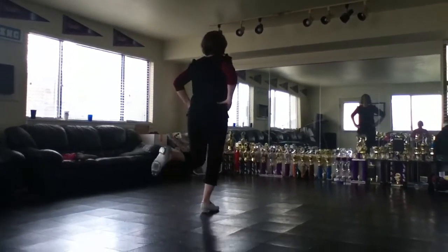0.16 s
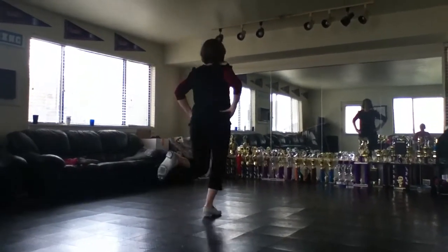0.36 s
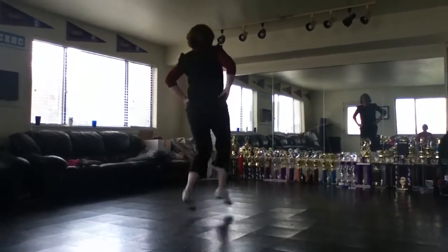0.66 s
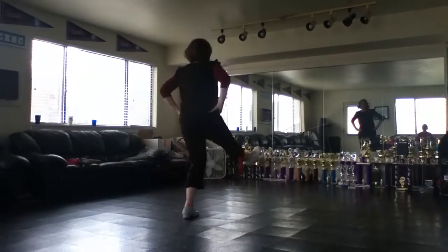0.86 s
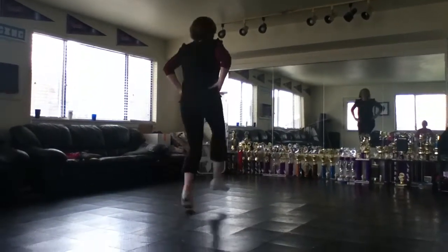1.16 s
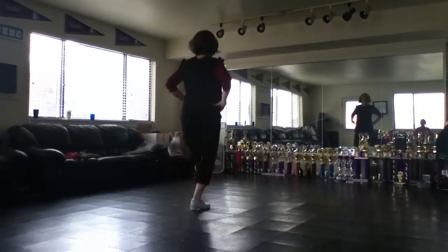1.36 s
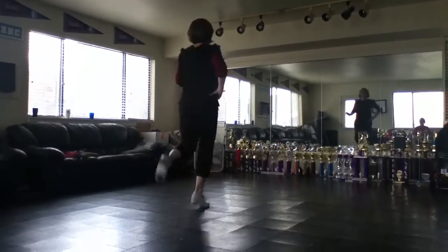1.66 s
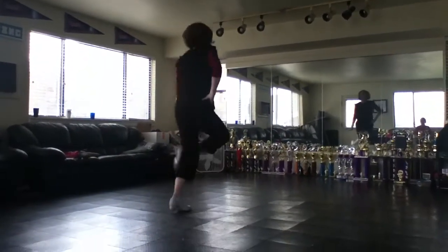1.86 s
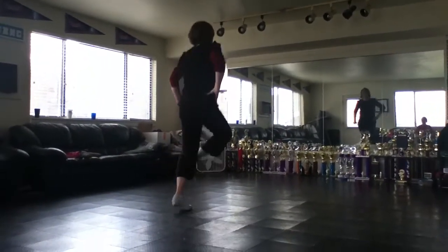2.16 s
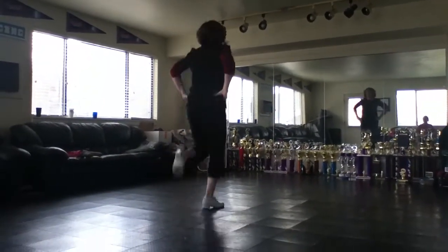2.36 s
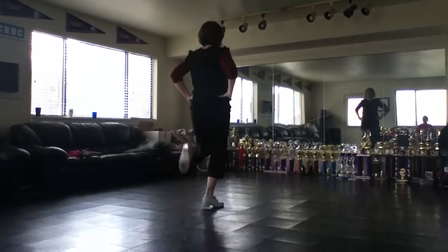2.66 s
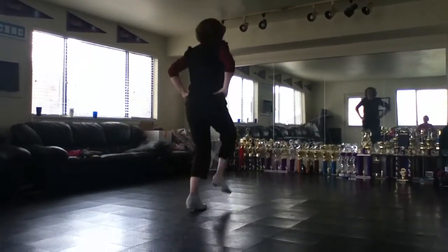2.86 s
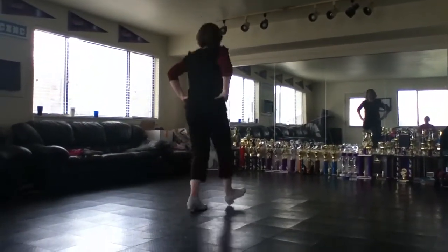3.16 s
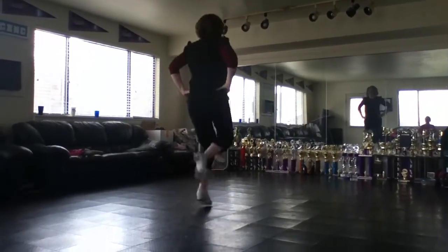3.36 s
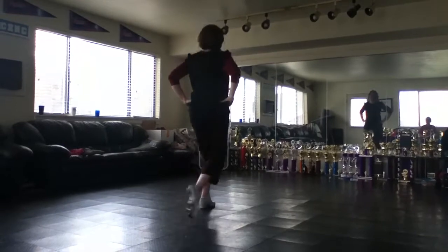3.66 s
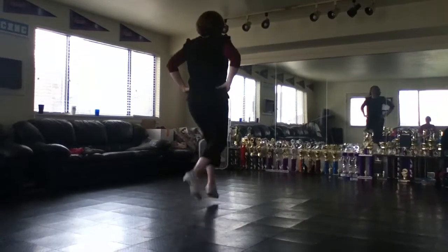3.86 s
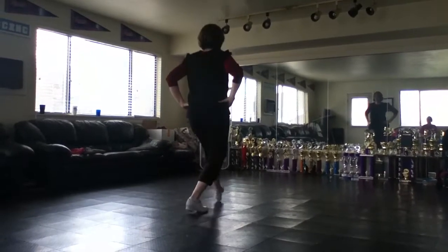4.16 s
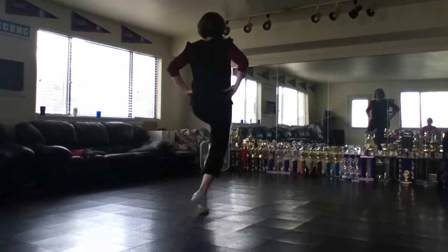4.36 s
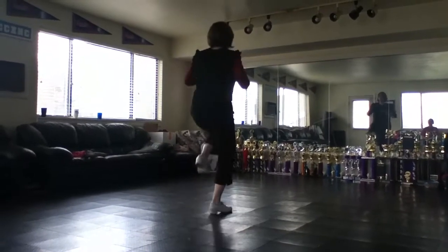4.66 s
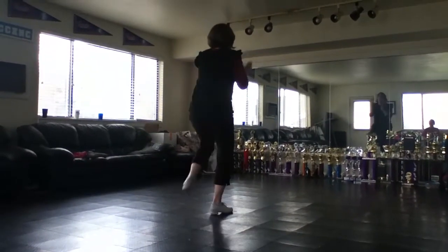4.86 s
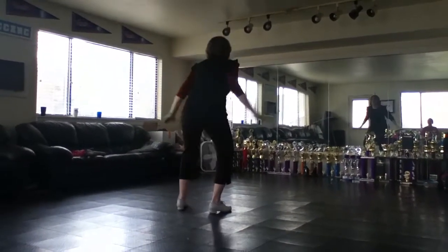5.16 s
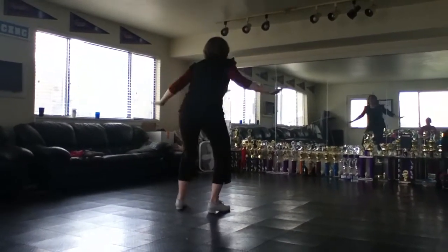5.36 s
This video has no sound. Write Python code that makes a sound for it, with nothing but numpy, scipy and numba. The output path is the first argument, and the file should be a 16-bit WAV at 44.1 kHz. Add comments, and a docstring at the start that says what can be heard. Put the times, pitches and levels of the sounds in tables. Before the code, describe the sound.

A clog dancer works on a tiled floor in a lively mirrored studio, heard in mono from a few metres away. The sound opens on the ringing tail of a stamp just past. Faint steel ticks from a swinging foot come at 0.7 to 0.9 seconds, then a brush and a hard stamp near 1.0. More stamps land at about 1.5, 2.1, 2.6 and 3.1, then quicken at 3.4, 3.7, 3.9 and 4.2. Each is a rapid double touch: low floor thump, tile knock, woody sole clack and bright crack, with loose plates jingling on landing and rebound. Soft brushes and airy jingles fill some gaps. At 4.7 a heavier, less jingly stamp coincides with one mid-range handclap. Two nearly joined stamps finish at about 5.25, their echoes dying into a faint steady hush. Peaks are firmly limited and the extreme top is dull.

```python
"""A clog dancer stamps a slow, then quicker figure on a tiled floor in a bright mirrored studio, a few metres from a camera.
Each stamp lands in two touches that thump the floor, knock the tile, clack the sole and crack the steel tap.
Light brushes lead into some stamps, and loose tap plates jingle as the feet land, rebound and swing.
One hand clap, a burst of mid-range noise, joins a late stamp. Blows pass through echoes and a fading room tail,
over a faint steady hush; the camera's limiter holds the peaks."""
import sys
import numpy as np
from scipy import signal
from scipy.fft import rfft, irfft
from scipy.io import wavfile
from scipy.ndimage import uniform_filter1d, minimum_filter1d
from numba import njit

SR = 44100
rng = np.random.default_rng(int(sys.argv[2]) if len(sys.argv) > 2 else 0)


def to_wav(s):
    """Save 16-bit WAV."""
    ch = np.atleast_2d(s).T  # columns
    pcm = np.round(np.clip(ch, -1, 1) * 32767)  # PCM
    wavfile.write(sys.argv[1], SR, pcm.astype(np.int16))


N = 243431  # length in samples

# Resonances of the steel plates, listed for each shoe.
# Each row: frequency in Hz, width at half power in Hz, relative level in dB.
PLATE_MODES = { "right": [(4970, 410, -2), (5210, 220, -4), (5570, 160, -5.5), (5890, 21, 6),
               (5764, 160, 2.5), (7540, 120, -19), (7970, 91, -7.5), (8450, 120, -5), (10660, 32, -8),
               (12850, 110, -26), (14400, 300, -10)], "left": [(4240, 730, -3), (4530, 164, 3),
               (4790, 180, 8.5), (5780, 310, 0.5), (6670, 69, 4.5), (7550, 210, 3.5), (8830, 68, 7),
               (11300, 140, -14), (11800, 100, -16), (12900, 140, -12), (13800, 200, -37)]}
# The floor's deep sway under full weight.
# Each row: frequency in Hz, width at half power in Hz, relative level in dB.
SWAY_MODES = [(50, 6.5, -6), (70, 12, -7), (116, 46, -7.5), (164.4, 17, 3.5), (208, 46, 2.5)]
# The floor's thud. Each row: frequency in Hz, width at half power in Hz, relative level in dB.
THUD_MODES = [(223, 10, -4), (244.4, 36, -0.5), (293, 100, -1), (331.8, 38, -4)]
# The tile on its bed. Each row: multiple of the pitch, width as a share of the pitch, relative level in dB.
TILE_MODES = [(.78, 0.16, -6), (1.0, 0.18, 1), (1.13, 0.15, -7), (1.33, 0.13, -4)]
# The hard sole. Each row: multiple of the pitch, width as a share of the pitch, relative level in dB.
SOLE_MODES = [(1.0, 0.27, 5), (1.27, 0.13, -8.5), (1.65, 0.53, -3), (2.2, 0.54, -23.5)]
# How the studio fades. Each row: frequency in Hz, time to fall by 60 dB in seconds.
ROOM_FADE = [(60, 0.68), (200, 0.37), (450, 0.6), (1100, 0.63), (2900, 0.87), (5500, 0.8), (9000, 0.6),
             (15000, 0.38)]
# First reflections from floor, ceiling, mirrors and walls.
# Each row: typical delay in seconds, level against the direct sound in dB.
FIRST_ECHOES = [(.0021, -9), (.0052, 0.5), (.0088, -9), (0.0116, -8), (.019, -8.5), (0.0247, -7.5),
                (.0325, -25.5), (.047, -10)]
# Colour of the background hush. Each row: frequency in Hz, relative level per Hz in dB.
HUSH_COLOUR = [(25, -2.5), (60, -11.5), (150, -3.5), (300, -3), (600, -9.5), (1200, -8.5), (3000, -15),
               (7000, -25.5), (11000, -27.5), (15000, -31)]
# Stamps: weight deepens the blow, toe shifts it from the tile to the steel tap.
# Each row: start in seconds, shoe, force in dB, weight in dB, toe in dB, tile pitch in Hz,
# sole pitch in Hz, rattle in dB.
STAMP_EVENTS = [ (-.125, "left", 3, 3.5, 1.5, 690, 1150, -0.5), (.969, "right", 1.5, -1, -1, 687, 1055, 4),
                (1.515, "left", 1.5, -4.5, -2, 668, 1067, -1.5),
                (2.067, "right", -0.5, -1, -2.5, 702, 1066, 2), (2.584, "left", 2.5, 0, 0.5, 623, 1080, 3),
                (3.099, "right", 2, -1, 0, 647, 1010, 2), (3.377, "left", 1, -1.5, -3, 795, 1480, 2),
                (3.657, "right", -2.5, -1.5, -0.5, 724, 1060, 2), (3.904, "left", 2, 0, 0, 568, 1084, -4),
                (4.195, "right", 2, -4, 0.5, 634, 1080, -1), (4.738, "right", -2, 6, 4, 584, 1005, -13),
                (5.254, "left", 2, 4, -1, 690, 1140, -8), (5.286, "right", -2, -4, 5, 755, 1200, -23)]
# Light brushes of the free foot just ahead of a stamp.
# Each row: start in seconds, shoe, force in dB, weight in dB, toe in dB.
BRUSH_EVENTS = [ (.872, "right", -18.5, 0, -2), (1.411, "right", -25.5, -4, 7.5),
                (1.434, "left", -23, -3, 5), (1.995, "right", -23, -2.5, -2), (2.486, "left", -24, -2, 0.5),
                (3.047, "right", -27.5, 1, 1), (3.076, "right", -29, -4, 2),
                (4.661, "right", -30.5, 5, -3.5), (4.694, "right", -19.5, 5.5, 2.5)]
# A swung foot shakes its loose plates in the air. Each row: start in seconds, shoe, level in dB.
FLICK_EVENTS = [ (.70, "right", -20.5), (0.783, "right", -18), (.901, "right", -5.5), (1.80, "left", -16.5),
                (2.225, "right", -10.5), (2.484, "right", -13), (2.823, "left", -11), (3.613, "left", -17),
                (4.338, "left", -7.5), (4.66, "right", -16.5)]
# The tap on each shoe. Each entry: crack cut-off in Hz, rattle on landing in dB,
# rattle on the plate's rebound in dB.
SHOE_TAPS = {"right": (6800, -11, -1.4), "left": (5570, -4, -2.8)}
# How each foot settles after its first touch.
# Each entry: delay of the second touch in seconds, its force against the first in dB.
FOOT_SETTLE = {"right": (.026, -4.5), "left": (.011, -6)}
# When each shoe's loose plate swings back. Each entry: delay after the foot lands in seconds.
PLATE_REBOUND = {"right": .042, "left": .018}

LEAD = SR // 4  # samples of run-up, so that a stamp can start before time zero
BODY_SIZE, ROOM_SIZE = 8192, 32768  # samples in a struck body's ring and in the room's tail
HZ = np.fft.rfftfreq(BODY_SIZE, 1 / SR) + 1e-3  # just above zero, so that we can divide by it

# each part's level in dB, in a blow of 0 dB force, weight and toe
SWAY_DB, THUD_DB, KNOCK_DB, CLACK_DB, CRACK_DB = -8.5, -5.5, -1.5, .5, -1
SWAY_PER_WEIGHT = 1.45  # dB per dB: the deep sway needs the body's weight more than the thud does
STAMP_CONTACT_S, BRUSH_CONTACT_S = 0.012, 0.0039  # time for the shoe's grinding to fall by 60 dB
BRUSH_TILE_HZ, BRUSH_SOLE_HZ = 655, 990
BRUSH_RATTLE_DB = -2.5  # the plate's rattle against the force of the brush
RATTLE_S = .026  # a loose plate's bounces are spread within this time
FLOOR_TICK_DB, AIR_TICK_DB = -2.5, -9  # tick against ring: a plate rings more purely in the air
TOP_HZ = 15500  # the camera passes nothing much above this


def undb(db):
    """Decibels to gain."""
    return 10 ** (np.asarray(db) / 20)


def unit(x):
    """Scale to an energy of one."""
    return x / np.sqrt(np.sum(x ** 2))


def fade(t, t60):
    """Exponential decay, 60 dB down after t60 seconds."""
    return np.exp(-np.log(1000) * t / t60)


def on_log_axis(points, hz):
    """Read (Hz, value) points at any frequency."""
    f, value = np.transpose(points)
    return np.interp(np.log(hz + 1), np.log(f), value)


def add(track, start, sound):
    """Mix a sound in from sample start on, dropping what runs past the end."""
    part = sound[:len(track) - start]
    track[start:start + len(part)] += part


def resonances(modes, db, pitch=1):
    """Power spectrum of coupled pairs of damped modes: steep skirts, and a swell before the fade."""
    f, width, mode_db = np.transpose(modes)[:, :, None]
    detune = (HZ / (pitch * f) - pitch * f / HZ) * f / width
    peaks = undb(mode_db) ** 2 / (1 + (np.sqrt(2) - 1) * detune ** 2) ** 2
    power = np.sum(peaks, axis=0)
    # db sets the level of all the modes together
    return undb(db) ** 2 * power / power.mean()


def crack(db, lo_hz, hi_hz, order=6):
    """Power spectrum of two hard faces meeting; softer contact lowers the upper edge."""
    low_edge = 1 / (1 + (lo_hz / HZ) ** order)
    power = low_edge / (1 + (HZ / hi_hz) ** order)
    return undb(db) ** 2 * power / power.mean()


def struck(power, ripple_db, ripple_hz):
    """A body's ring after one blow; the spot that is hit favours some of its many small modes."""
    spots = np.arange(0, SR, ripple_hz)
    favour = rng.standard_normal(BODY_SIZE)[:len(spots)]
    ripple = undb(ripple_db * np.interp(HZ, spots, favour)) ** 2
    # minimum phase: nothing sounds before the blow
    cepstrum = irfft(np.log(power * ripple / ripple.mean() + 1e-9) / 2)
    cepstrum[1:BODY_SIZE // 2] *= 2
    cepstrum[BODY_SIZE // 2 + 1:] = 0
    return irfft(np.exp(rfft(cepstrum)))


def diffuse_tails(build_s, count=16):
    """Dense reflections for several spots on the floor: they build up, then die at each band's own rate."""
    noise = rng.standard_normal((count, ROOM_SIZE))
    f, frames, cells = signal.stft(noise, SR, nperseg=512)
    # keep only the random phases, then fade every band
    cells = cells / np.abs(cells) * fade(frames, on_log_axis(ROOM_FADE, f)[:, None])
    build = 1 - np.exp(-np.arange(ROOM_SIZE) / SR / build_s)
    tails = signal.istft(cells, SR)[1]
    return [unit(tail[:ROOM_SIZE] * build) for tail in tails]


def studio(tail, contact_s, direct_db, tail_db):
    """A gritty contact heard directly, by first reflections that shift as the dancer moves, and diffusely."""
    t = np.arange(BODY_SIZE // 2) / SR
    contact = unit(rng.standard_normal(len(t)) * fade(t, contact_s))
    response = undb(tail_db) * tail
    add(response, 0, undb(direct_db) * contact)
    for delay, db in FIRST_ECHOES:
        shifted = delay * rng.uniform(.8, 1.2)
        add(response, int(shifted * SR), undb(direct_db + db) * contact)
    return response


def footfall(tails, spot, shoe, force_db, weight_db, toe_db, tile_hz, sole_hz, contact_s):
    """Tap and sole crack at first touch; tile and floor answer a moment later, as the weight comes down."""
    out = np.zeros(2 * ROOM_SIZE)
    tap = crack(force_db + CRACK_DB + toe_db, lo_hz=1430, hi_hz=SHOE_TAPS[shoe][0])
    sole = resonances(SOLE_MODES, force_db + CLACK_DB, sole_hz)
    path = studio(tails[spot % len(tails)], contact_s, direct_db=3.5, tail_db=9.0)
    shoe_ring = struck(sole + tap, ripple_db=2.5, ripple_hz=49.73)
    add(out, 0, signal.fftconvolve(shoe_ring, path))

    sway = resonances(SWAY_MODES, force_db + SWAY_DB + SWAY_PER_WEIGHT * weight_db)
    thud = resonances(THUD_MODES, force_db + THUD_DB + weight_db)
    knock = resonances(TILE_MODES, force_db + KNOCK_DB - toe_db, tile_hz)
    path = studio(tails[-1 - spot % len(tails)], contact_s=0.06, direct_db=5, tail_db=9.0)
    floor_ring = struck(sway + thud + knock, ripple_db=2.0, ripple_hz=29.8)
    add(out, int(0.00203 * SR), signal.fftconvolve(floor_ring, path))
    return out


def steps(tails):
    """A stamp lands in two touches, as the rest of the foot comes down; a brush is one light, glancing touch."""
    out = np.zeros(LEAD + N)
    for spot, (s, shoe, force_db, *colour, _) in enumerate(STAMP_EVENTS):
        settle_s, settle_db = FOOT_SETTLE[shoe]
        first = footfall(tails, spot, shoe, force_db, *colour, STAMP_CONTACT_S)
        add(out, LEAD + int(s * SR), first)
        second = footfall(tails, spot + 2, shoe, force_db + settle_db, *colour, STAMP_CONTACT_S)
        add(out, LEAD + int((s + settle_s) * SR), second)
    for spot, (s, *blow) in enumerate(BRUSH_EVENTS):
        brush = footfall(tails, spot, *blow, BRUSH_TILE_HZ, BRUSH_SOLE_HZ, BRUSH_CONTACT_S)
        add(out, LEAD + int(s * SR), brush)
    return out


def chatter(tails, length, count=4):
    """The loose plate bounces unevenly against the fixed one, tending to weaken each time."""
    out = np.zeros(ROOM_SIZE)
    gaps = rng.uniform(.5, 1.5, count)
    delays = length * (np.cumsum(gaps) - gaps[0]) / np.sum(gaps)
    sizes_db = -2.5 * np.arange(count) + 3.5 * rng.standard_normal(count)
    sizes = unit(undb(sizes_db))
    for delay, size, spot in zip(delays, sizes, rng.permutation(len(tails))):
        bounce = studio(tails[spot], contact_s=0.0019, direct_db=-1.5, tail_db=4.5)
        add(out, int(delay * SR), size * bounce)
    return out


def rattle(tails, shoe, db, tick_db):
    """One shoe's loose plate chatters: a tick and a steel ring at each touch."""
    tick = crack(tick_db, lo_hz=4330, hi_hz=9100)
    ring = resonances(PLATE_MODES[shoe], 0)
    steel = struck(ring + tick, ripple_db=4.0, ripple_hz=59.6)
    return undb(db) * signal.fftconvolve(steel, chatter(tails, RATTLE_S))


def jingles(tails):
    """The taps rattle as a stamp lands, again as the plate rebounds, and whenever a foot brushes or is flicked."""
    out = np.zeros(LEAD + N)
    for s, shoe, *_, rattle_db in STAMP_EVENTS:
        _, landing_db, rebound_db = SHOE_TAPS[shoe]
        landing = rattle(tails, shoe, rattle_db + landing_db, FLOOR_TICK_DB)
        add(out, LEAD + int(s * SR), landing)
        rebound = rattle(tails, shoe, rattle_db + rebound_db, FLOOR_TICK_DB)
        add(out, LEAD + int((s + PLATE_REBOUND[shoe]) * SR), rebound)
    for s, shoe, force_db, *_ in BRUSH_EVENTS:
        brushed = rattle(tails, shoe, force_db + BRUSH_RATTLE_DB, FLOOR_TICK_DB)
        add(out, LEAD + int(s * SR), brushed)
    for s, shoe, db in FLICK_EVENTS:
        add(out, LEAD + int(s * SR), rattle(tails, shoe, db, AIR_TICK_DB))
    return out


def hush(db):
    """Faint steady room noise: random noise coloured by frequency."""
    colour = undb(on_log_axis(HUSH_COLOUR, np.fft.rfftfreq(N, 1 / SR)))
    noise = irfft(rfft(rng.standard_normal(N)) * colour, N)
    # db sets the average (RMS) level
    return undb(db) * np.sqrt(N) * unit(noise)


def clap(tails):
    """One flat-handed clap: two palms meet with a broad mid-range crack."""
    out = np.zeros(LEAD + N)
    palms = struck(crack(0, lo_hz=1380, hi_hz=4340), ripple_db=0.0, ripple_hz=155)
    path = studio(tails[-1], contact_s=0.01, direct_db=6.0, tail_db=2.5)
    add(out, LEAD + int(4.733 * SR), signal.fftconvolve(palms, path))
    return out


def scene():
    """The dancer in the studio, with the run-up cut off and the hush added."""
    tails = diffuse_tails(build_s=0.0035)
    dancer = steps(tails) + jingles(tails) + clap(tails)
    return (dancer[LEAD:] + hush(db=-58))[None]


@njit
def peak_follower(x, release):
    """Jumps to each peak and sinks back slowly."""
    out, level = np.empty(len(x)), 0.
    for i in range(len(x)):
        level = max(abs(x[i]), level * release)
        out[i] = level
    return out


def limiter(x, ceiling_db, release_s):
    """Turns the gain down just ahead of each peak that would pass the ceiling."""
    peaks = peak_follower(x, np.exp(-1 / (release_s * SR)))
    gain = np.minimum(1, undb(ceiling_db) / (peaks + 1e-9))
    # look a few samples ahead, then smooth the turn
    return x * uniform_filter1d(minimum_filter1d(gain, size=33), size=33)


def record(dry):
    """The camera limits the peaks and cuts the top."""
    # the small microphone is dull at the very top
    dull = signal.butter(2, 13000, fs=SR, output="sos")
    heard = signal.sosfilt(dull, dry[0])
    held = limiter(heard, ceiling_db=-1.0, release_s=0.11)
    top_cut = signal.ellip(8, .2, 70, TOP_HZ, fs=SR, output="sos")
    return signal.sosfilt(top_cut, held)[None]


dry = scene()
out = record(dry)
to_wav(out)
```